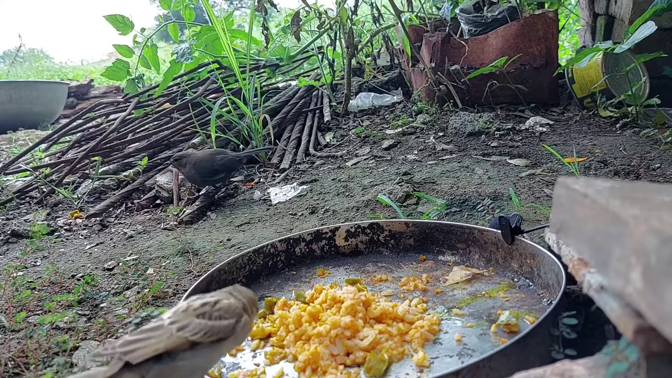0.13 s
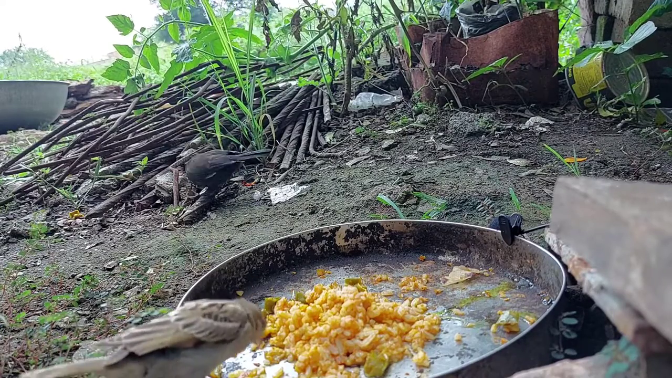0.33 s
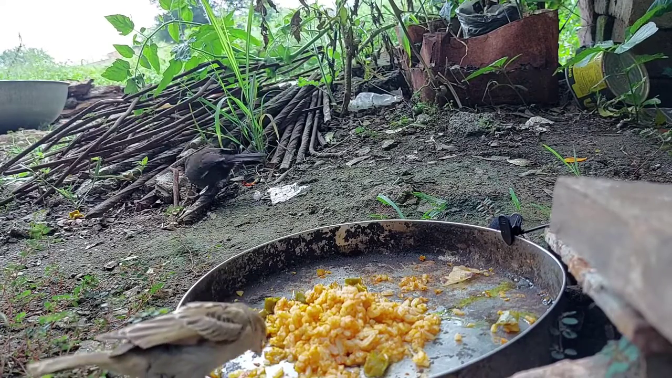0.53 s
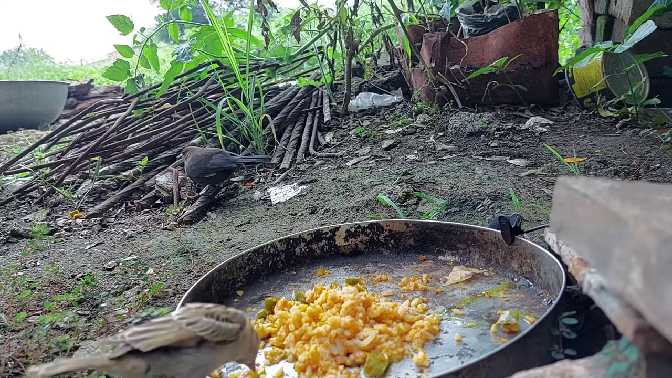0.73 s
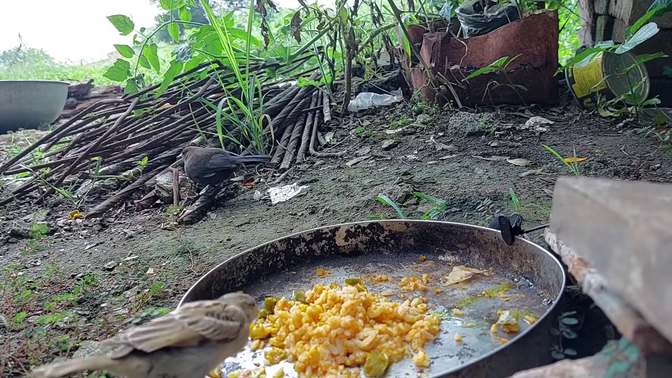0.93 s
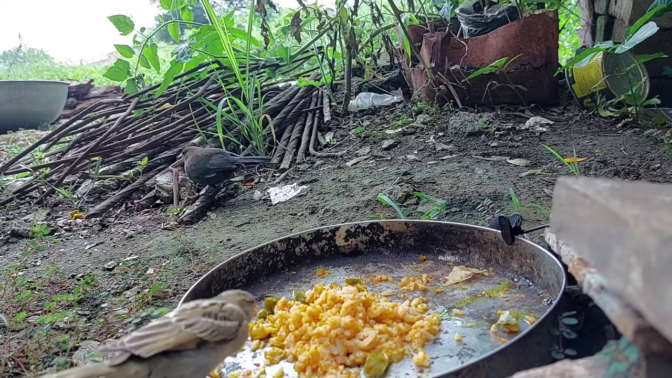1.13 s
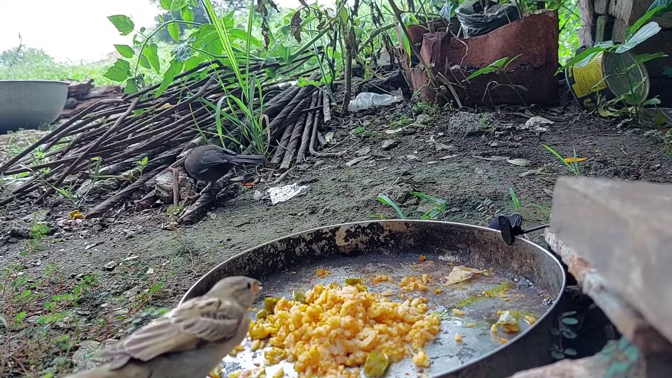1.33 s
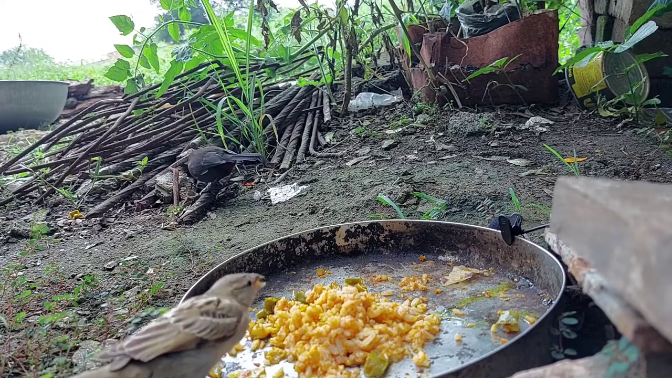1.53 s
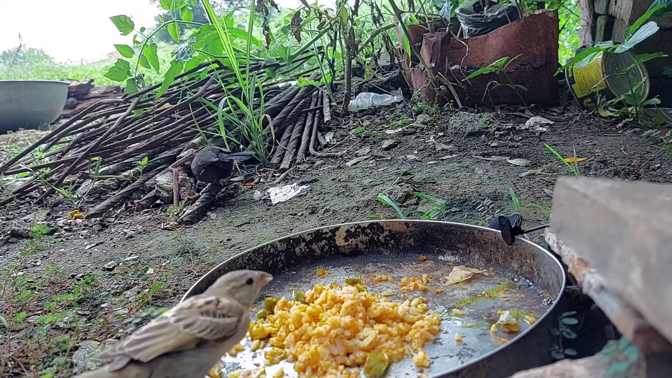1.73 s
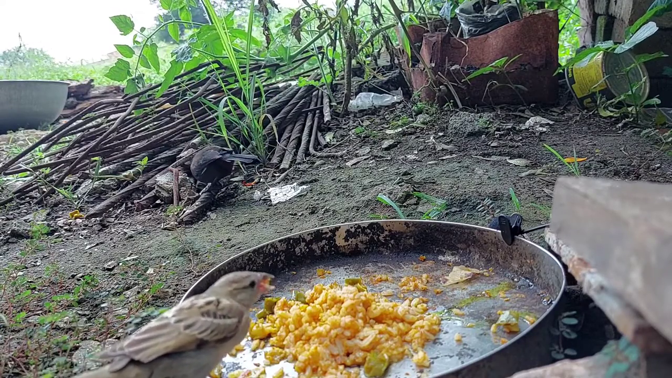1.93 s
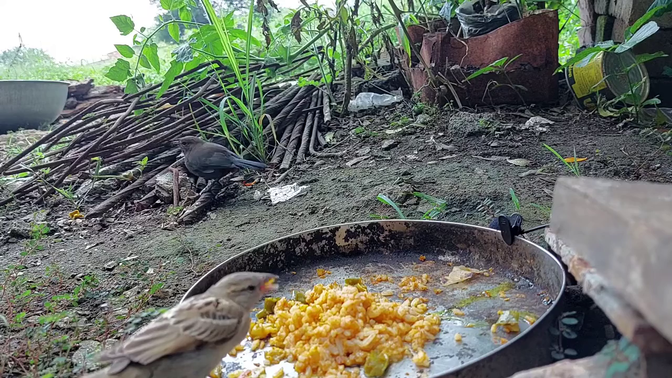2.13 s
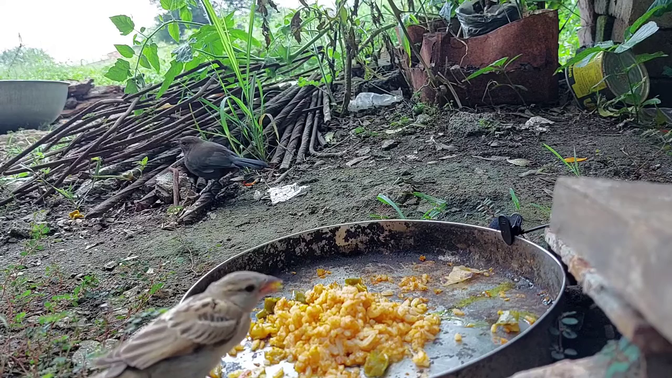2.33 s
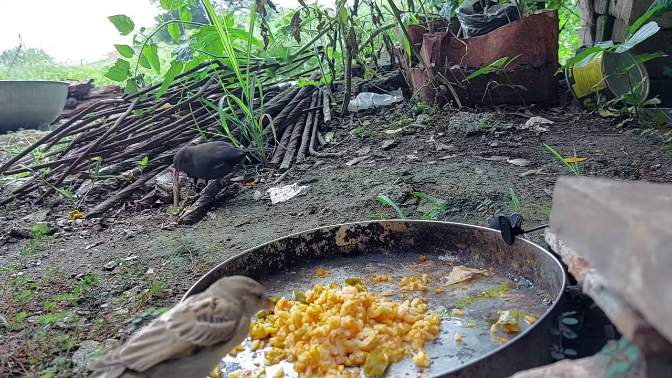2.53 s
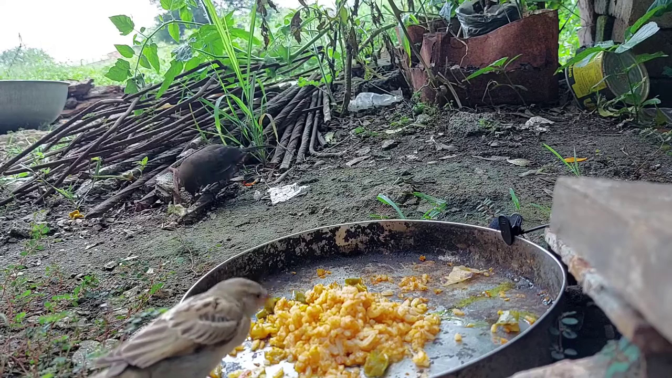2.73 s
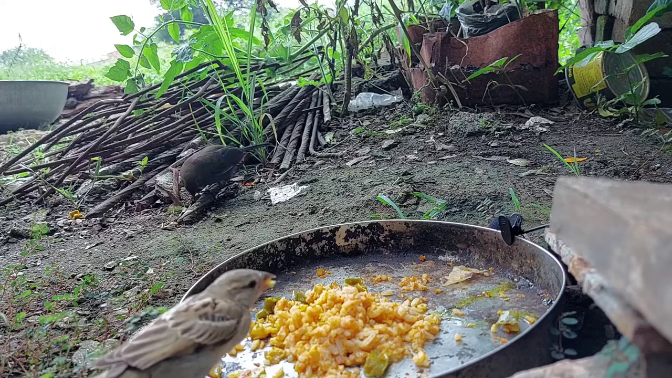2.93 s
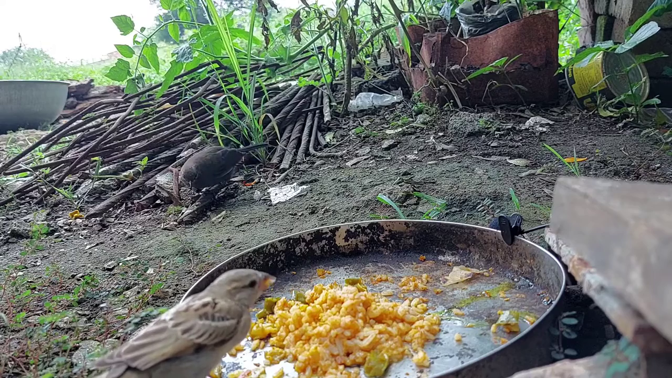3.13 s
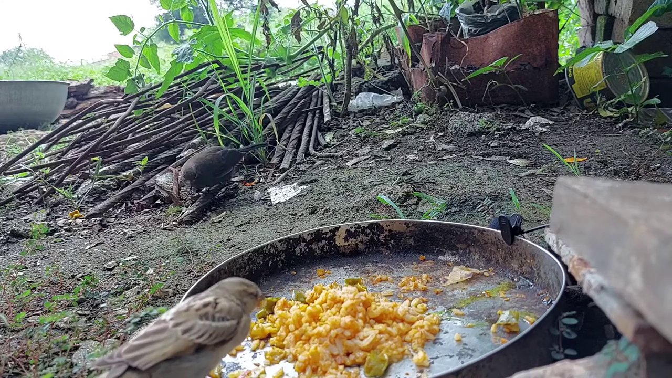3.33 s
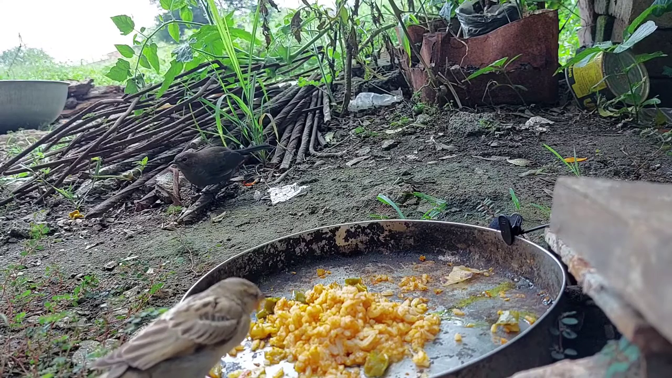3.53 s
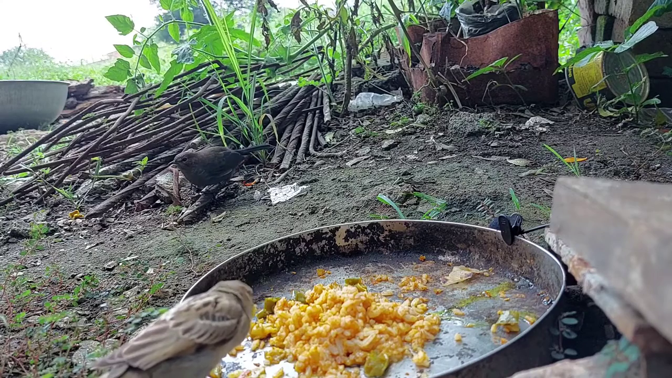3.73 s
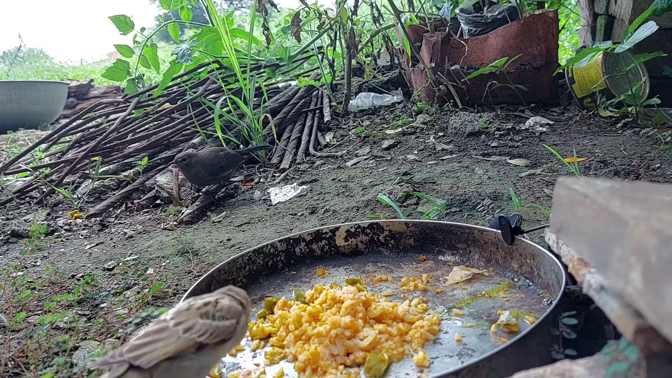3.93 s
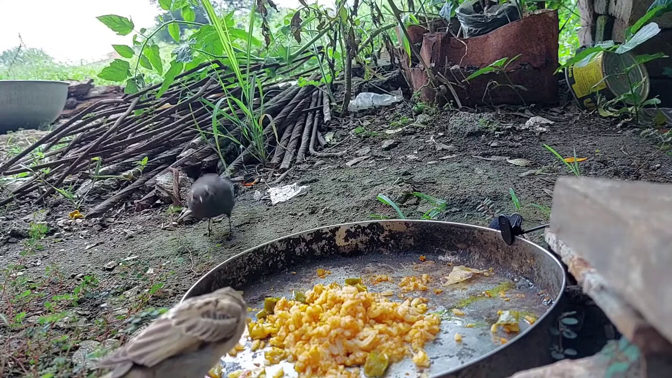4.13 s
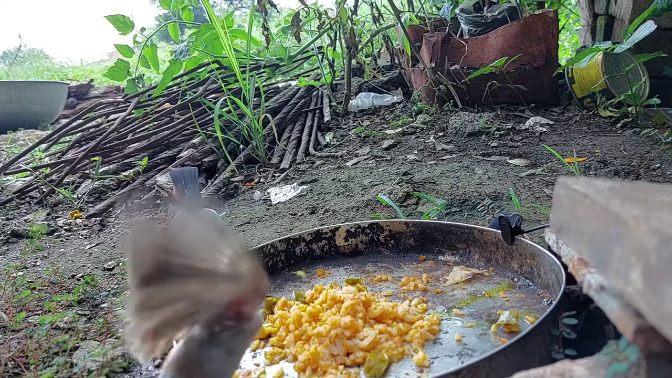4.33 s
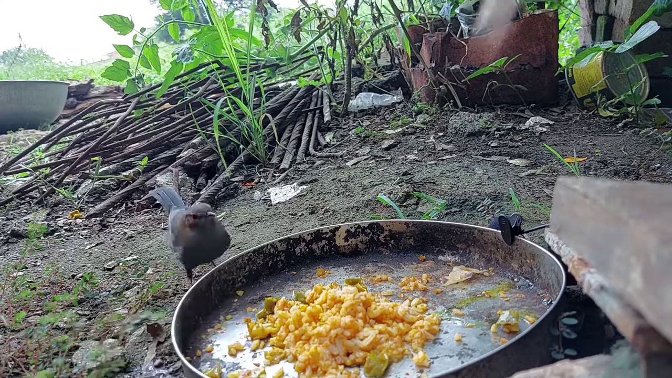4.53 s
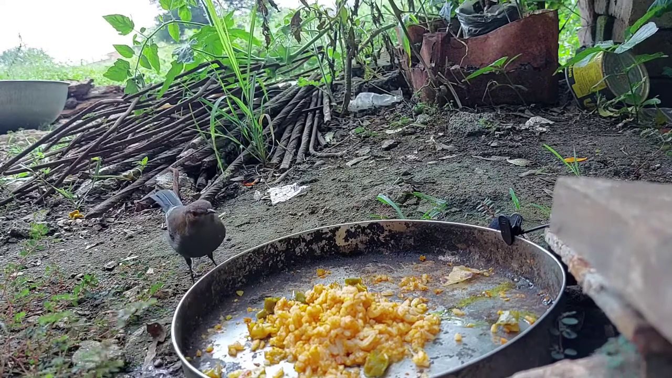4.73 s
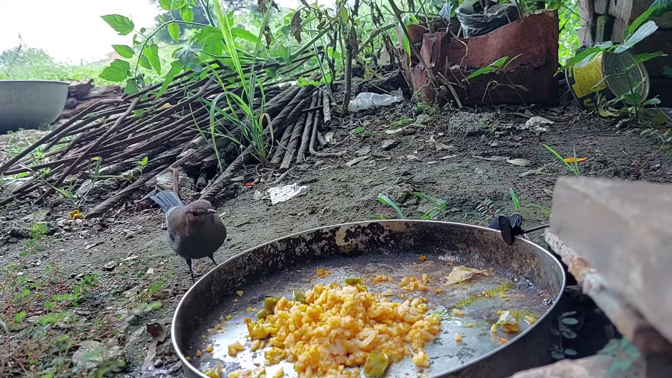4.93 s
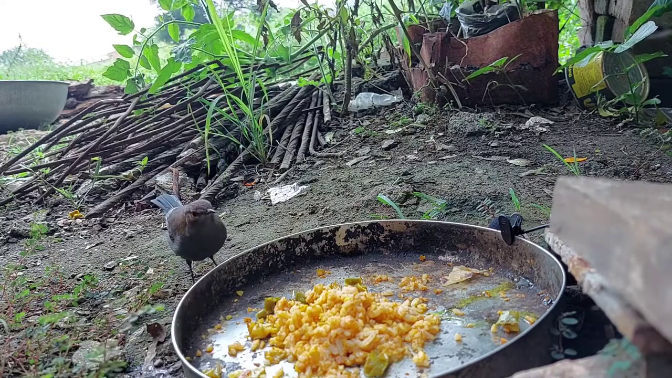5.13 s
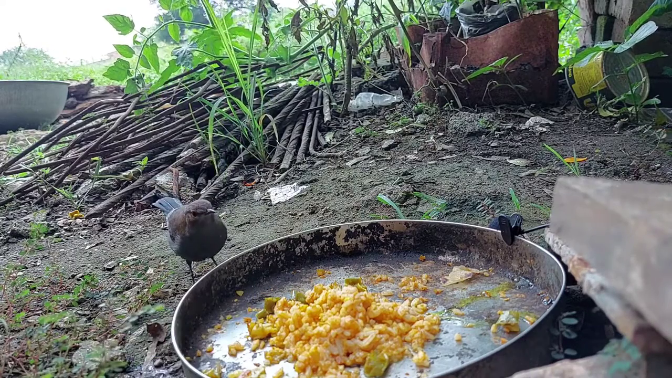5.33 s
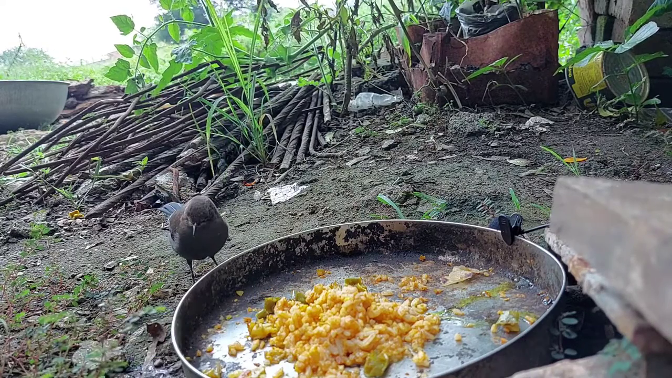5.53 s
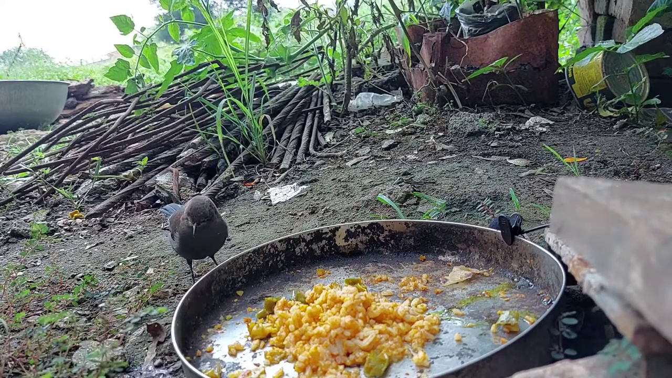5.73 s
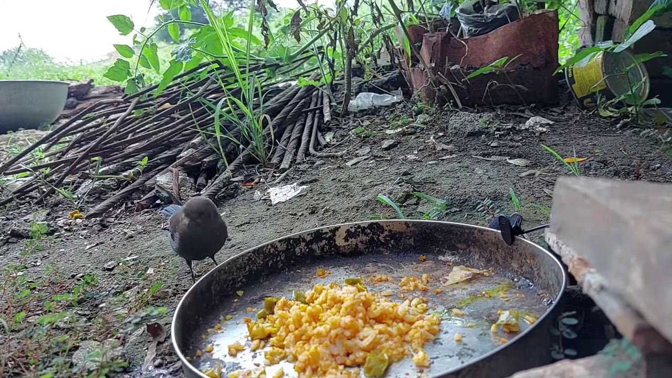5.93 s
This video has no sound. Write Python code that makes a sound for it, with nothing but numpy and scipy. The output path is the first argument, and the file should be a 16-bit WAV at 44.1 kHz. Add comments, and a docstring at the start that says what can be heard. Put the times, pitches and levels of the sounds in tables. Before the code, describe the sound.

Light beak ticks on a metal pan outdoors, then claws clack and a small bird flutters off right past the microphone.

```python
"""A quiet yard, close to a metal feeding pan. A sparrow pecks, shuffles its feathers and takes off.
Beak, claws and wing tips strike and scrape the pan, exciting its damped modes. Each wingbeat swishes
by friction between the feathers and pushes air at the microphone, fading as the bird flutters away.
Far off, small birds chirp and a faint hum comes and goes over a low rumble and a soft hiss."""
import sys
import numpy as np
from scipy import signal
from scipy.fft import rfft, irfft, next_fast_len
from scipy.io import wavfile
from scipy.ndimage import uniform_filter1d

SR = 44100
rng = np.random.default_rng(int(sys.argv[2]) if len(sys.argv) > 2 else 0)


def wav_out(sig):
    """Save sig, one row per channel (or a flat mono array), as 16-bit PCM at SR to the path in sys.argv[1]."""
    wavfile.write(sys.argv[1], SR, np.round(np.clip(np.atleast_2d(sig).T, -1, 1) * 32767).astype(np.int16))


N = 267510
T = np.arange(N) / SR
AGE = T[:SR // 2]  # time within one short event

# Spectrum of dry keratin scratching. Each row: frequency in Hz, gain in dB.
KERATIN_SPECTRUM = [(220, -24), (520, -7.5), (1500, -7.5), (2600, -10), (4200, -0.5), (5200, -4.5),
                    (7000, 5.5), (9000, 2.5), (10500, -7), (12500, -20.5), (15500, -39.5)]
# Spectrum of sliding feathers. Each row: frequency in Hz, gain in dB.
FEATHER_SPECTRUM = [(200, -23), (800, -14.5), (1700, -10.5), (3000, -9.5), (5000, -10), (7000, 2),
                    (9500, 2), (11000, -9), (13000, -19), (15500, -33.5)]
# Air pushed by the wings, strongest as the bird passes closest. Each row: time in seconds, level in dB.
WING_WASH = [(4.47, -37), (4.53, -21.5), (4.57, -27), (4.66, -38), (4.8, -47), (4.96, -44), (5.06, -39),
             (5.12, -49), (5.2, -50)]


def amp(db):
    """Decibels to amplitude ratio."""
    return 10 ** (np.asarray(db) / 20)


def curve(rows, column=1):
    """Linear interpolation of one table column over time."""
    rows = np.array(rows)
    return np.interp(T, rows[:, 0], rows[:, column])


def loudest(x, db, size=110):
    """Scale x so that its greatest short-time rms has this level."""
    return x * amp(db) / np.sqrt(uniform_filter1d(x * x, size).max())


def add(out, s, x):
    """Superpose x on out from time s."""
    start = max(int(s * SR), 0)
    out[start:start + len(x)] += x[:N - start]


def colour(x, points):
    """Minimum-phase filter through (Hz, dB) points, built by folding the cepstrum."""
    hz, db = np.transpose(points)
    n = 2 * next_fast_len(len(x))
    bin_hz = np.arange(n // 2 + 1) * SR / n
    gain = amp(np.interp(np.log(bin_hz + 1), np.log(hz), db))
    cepstrum = irfft(np.log(gain))
    cepstrum[1:n // 2] *= 2
    cepstrum[n // 2 + 1:] = 0
    return irfft(rfft(x, n) * np.exp(rfft(cepstrum)))[:len(x)]


def coloured_noise(spectrum):
    """Gaussian noise of unit rms with the given spectrum."""
    noise = colour(rng.standard_normal(N), spectrum)
    return noise / np.std(noise)


def cut(x, hz, kind, order=4):
    """Butterworth low-pass or high-pass."""
    return signal.sosfilt(signal.butter(order, hz, kind, fs=SR, output="sos"), x)


def walk(n, rate):
    """Slow random modulation of spread near 1, with rate new values a second."""
    return np.interp(T[:n] * rate, np.arange(n), rng.standard_normal(n))


def friction(rough_db, rate):
    """Stick-slip friction: noise whose level jumps as barbs or claws catch and slip."""
    return rng.standard_normal(len(AGE)) * amp(rough_db * walk(len(AGE), rate))


def swell(centre, width):
    """Gaussian envelope within an event."""
    return np.exp(-.5 * ((AGE - centre) / width) ** 2)


def plateau(t, hold, attack, release):
    """Exponential rise up to t = 0, a hold, then exponential decay."""
    return np.exp(np.minimum(t, 0) / attack - np.maximum(t - hold, 0) / release)


def scatter(x, t60, wet_db):
    """Diffuse reflection from ground, walls and leaves adds an exponentially decaying tail."""
    tail = rng.standard_normal(len(AGE)) * amp(-60 * AGE / t60) * (1 - np.exp(-AGE / .006))
    return x + amp(wet_db) * signal.fftconvolve(x, tail / np.linalg.norm(tail))[:N]


def yard():
    """Ambient noise: a low rumble under a soft hiss, highly correlated between the ears."""
    # Spectra of the common sound and the left-right difference. Each row: frequency in Hz, gain in dB.
    mid_spectrum = [(15, -26.5), (28, -11.5), (45, -4.5), (72, 2.5), (100, -3.5), (150, -12), (330, -20.5),
                    (700, -25), (1400, -27.5), (3000, -30.5), (4800, -35), (8300, -26), (10500, -35),
                    (12500, -45.5), (15500, -51)]
    side_spectrum = [(15, -42), (25, -6), (96, 11), (188, -11), (246, -7.5), (495, -12), (598, -16),
                     (970, -20), (1300, -30), (2420, -28.5), (3930, -26.5), (9550, -20.5), (15500, -23)]
    # Slow drift of the hiss. Each row: time in seconds, gain in dB.
    hiss_drift = [(.2, 5.5), (.5, 2.5), (1.1, 3.5), (2.4, 1.7), (3.7, 1.56), (5.3, -0.5), (6.07, -0.5)]
    mid = amp(-62.5) * coloured_noise(mid_spectrum)
    side = amp(-78) * coloured_noise(side_spectrum)
    # filtering forwards, then backwards offsets part of the phase lag
    lows = cut(cut(mid, 530, "low", order=2)[::-1], 240, "low", order=2)[::-1]
    rumble = lows * amp(-4 + 2.1 * walk(N, 3.5))
    hiss = (mid - lows) * amp(curve(hiss_drift) + .4 * walk(N, 6.3))
    return rumble + hiss + side * np.array([[1], [-1]])


def far_hum():
    """A faint low tone rises and fades; random frequency modulation makes it unsteady."""
    # Course of the tone. Each row: time in seconds, frequency in Hz, level in dB.
    course = [(1.1, 138, -75), (1.18, 156, -61), (1.26, 186, -65), (1.36, 189, -67.5), (1.44, 186, -62),
              (1.55, 181, -83)]
    hz = curve(course) * (1 + 0.03 * walk(N, 40))
    sounding = (T > course[0][0]) & (T < course[-1][0])
    return amp(curve(course, column=2)) * np.sin(2 * np.pi * np.cumsum(hz) / SR) * sounding


def bird_call(length, start_hz, end_hz, rough, bend):
    """A falling glide that levels out; fast frequency modulation spreads it into hoarse sidebands."""
    progress = np.clip(AGE / length, 0, 1)
    glide_hz = end_hz + (start_hz - end_hz) * (1 - progress) ** bend
    hz = glide_hz * (1 + 0.18 * rough * walk(len(AGE), 660))
    return np.sin(np.pi * progress ** 0.84) * np.sin(2 * np.pi * np.cumsum(hz) / SR)


def far_birds(whistle_pitch_ratio=1.32):
    """Frequency-modulated calls: hoarse chirps, all with the same fall, and two thin high whistles."""
    # Each row: start in seconds, length in seconds, level in dB.
    chirps = [(0.862, 0.084, -71), (1.23, 0.081, -74), (1.93, 0.13, -73.5), (2.119, 0.11, -72),
              (3.165, 0.14, -75), (3.885, .18, -75), (4.997, 0.13, -69), (5.11, 0.15, -76),
              (5.727, 0.095, -74), (5.92, .12, -74.5)]
    # Each row: start in seconds, length in seconds, end pitch in Hz, level in dB, roughness from 0 to 1.
    whistles = [(1.05, .07, 6500, -60, 0.4), (2.263, .1, 5450, -60, .08)]
    out = np.zeros(N)
    for s, length, db in chirps:
        add(out, s, amp(db) * bird_call(length, start_hz=4290, end_hz=3400, rough=0.52, bend=1.5))
    for s, length, end_hz, db, rough in whistles:
        add(out, s, amp(db) * bird_call(length, whistle_pitch_ratio * end_hz, end_hz, rough, bend=3.5))
    return out


def fidgets(shake_s=2.827, shake_hz=62, shake_depth_db=3.5, snip_decay_s=0.00094):
    """Friction of feathers in single flicks and one pulsing shake; brief impacts as the beak shuts."""
    # Feather flicks and snips at grains. Each row: time in seconds, level in dB.
    flicks = [(2.499, -58.5), (2.637, -53), (2.756, -53.5), (4.174, -51.5), (4.194, -53.5), (5.075, -58.5)]
    snips = [(0.078, -52), (0.7227, -54.5), (.7495, -53), (1.504, -55), (2.258, -49.5), (4.184, -57.5),
             (5.831, -55), (5.839, -52)]
    out, lead = np.zeros(N), 0.2
    for s, db in flicks:
        flick = friction(rough_db=3.5, rate=1000) * swell(lead, width=0.0036)
        add(out, s - lead, loudest(colour(flick, FEATHER_SPECTRUM), db))
    pulsing = amp(shake_depth_db * np.cos(2 * np.pi * shake_hz * (AGE - lead)))
    shake = friction(rough_db=4.5, rate=700) * swell(lead, width=0.034) * pulsing
    add(out, shake_s - lead, loudest(colour(shake, FEATHER_SPECTRUM), db=-44.5))
    for s, db in snips:
        snip = rng.standard_normal(len(AGE)) * np.exp(-AGE / snip_decay_s)
        add(out, s, loudest(colour(snip, KERATIN_SPECTRUM), db))
    return out


def draught(gust_s=4.445, gust_db=-34, wake_db=-17):
    """Turbulence at the microphone: a gust as the bird springs up, then a weaker wake from its wings."""
    # Spectrum of the eddies. Each row: frequency in Hz, gain in dB.
    eddy_spectrum = [(25, -12), (60, 10.5), (130, 2.5), (260, -8), (450, -12), (800, -18.5), (1600, -17),
                     (3500, -33.5), (10000, -42)]
    gust = amp(gust_db) * plateau(T - gust_s, hold=0.067, attack=.013, release=0.011)
    wake = amp(curve(WING_WASH) + wake_db) * (T > gust_s) * (T < WING_WASH[-1][0])
    return coloured_noise(eddy_spectrum) * np.hypot(gust, wake)


def wingbeats(fade_db_per_s=23.5):
    """Time and swish level of each beat: a nearly periodic train whose period drifts as it fades."""
    # Two bouts of flapping with a glide between. Each row: start, end, first period and
    # period growth per beat, all in seconds, then first swish level in dB.
    bouts = [(4.478, 4.78, .041, .0022, -51.5), (4.846, 5.13, .058, -.0027, -59)]
    beat = np.arange(8)
    for start, end, period, growth, db in bouts:
        for s in start + beat * period + beat * (beat - 1) / 2 * growth:
            if s < end:
                yield s, db - fade_db_per_s * (s - start)


def wings(stroke_width_s=.007, upstroke_lag_s=0.022, push_lag_s=0.006, push_hz=50):
    """Each stroke, down or up, makes friction noise and displaces air in a suck-then-push pulse."""
    out, lead = np.zeros(N), 0.05
    for s, db in wingbeats():
        strokes = swell(lead, stroke_width_s) + amp(-5.5) * swell(lead + upstroke_lag_s, stroke_width_s)
        swish = colour(friction(rough_db=1, rate=810) * strokes, FEATHER_SPECTRUM)
        add(out, s - lead, loudest(swish, db))
        wash_db = np.interp(s, *np.transpose(WING_WASH))
        for lag, stroke_db in ((0, 0), (upstroke_lag_s, -10)):
            centre = lead + push_lag_s + lag
            push = np.sin(2 * np.pi * push_hz * (AGE - centre)) * swell(centre, 0.46 / push_hz)
            add(out, s - lead, amp(wash_db + stroke_db) * push)
    return out


def touch_pan(skid, knock, ring_db, scratch_db, spot_hz, split_hz=3100):
    """Modal response: the weight of a touch rings the pan's low modes, its edge scratches the high."""
    # Modes of the pan, damped by the food in it.
    # Each row: frequency in Hz, relative level in dB, time to decay by 60 dB in seconds.
    pan_modes = [(459.3, -23.5, 0.062), (687, -30, .19), (776, -16.5, 0.011), (937, -20, 0.12),
                 (1196, -12, .03), (1230, -31.5, 0.32), (1248, -5.5, 0.028), (1416, -4, 0.014),
                 (1550, -1.5, 0.014), (1676, -20.5, 0.077), (1930, -6, 0.041), (1945, -29.5, .16),
                 (2252, -15.5, 0.094), (2606, -18.5, 0.1), (3035, -10, 0.036), (3407, -13, 0.058),
                 (4333, -4, .022), (4550, -7.5, .04), (5550, -21, 0.068), (5930, -17, 0.02),
                 (6810, -5.5, 0.038), (7670, -7.5, .05), (7800, -16.5, .05), (9220, -11, .05)]
    modes = sum((-1) ** k * amp(db - 60 * AGE / t60) * np.sin(2 * np.pi * hz * AGE)
                for k, (hz, db, t60) in enumerate(pan_modes))
    # the dry sound of the contact also radiates straight into the air
    direct = colour(1. * (AGE == 0), KERATIN_SPECTRUM) / 2
    ring = signal.fftconvolve(skid + knock, modes + amp(27) * direct)[:len(AGE)]
    scratch = signal.fftconvolve(skid, modes + amp(33) * direct)[:len(AGE)]
    # the touched spot favours one range of modes, the more so the blunter the blow
    focus_db = max(7 + .4 * (ring_db - scratch_db), 0)
    octaves = np.linspace(-2, 2, 41)
    boost_db = focus_db * np.exp(-.5 * (octaves / 0.21) ** 2)
    ring = colour(ring, np.column_stack([spot_hz * 2 ** octaves, boost_db]))
    lows = loudest(cut(ring, split_hz, "low"), ring_db)
    highs = loudest(cut(scratch, split_hz, "high"), scratch_db)
    return lows + highs


def pan_scrapes():
    """Stick-slip excitation: feet and wing tips drag over the metal at take-off and keep it ringing."""
    # Each row: start and length in seconds, ring and scratch levels in dB, favoured frequency in Hz.
    scrapes = [(4.387, 0.038, -35, -45, 1737), (4.444, 0.02, -31.5, -46.5, 1550),
               (4.468, 0.0073, -29.5, -38, 1447), (4.486, .012, -34, -30, 900)]
    out, lead = np.zeros(N), 0.02
    for s, length, ring_db, scratch_db, spot_hz in scrapes:
        envelope = plateau(AGE - lead, length, attack=.0015, release=.0025)
        drag = friction(rough_db=5, rate=900) * envelope
        add(out, s - lead, touch_pan(drag, 0, ring_db, scratch_db, spot_hz))
    return out


def pan_strikes(knock_over_skid_db=2):
    """Impact excitation: beak or claw gives the pan an impulse within a short skid."""
    # Each row: start in seconds, ring and scratch levels in dB, skid decay time in seconds,
    # favoured frequency in Hz.
    strikes = [(0.077, -57.5, -52, 0.0033, 800), (0.497, -61, -61, 0.0023, 1160),
               (0.5599, -51.5, -46.5, 0.0018, 1900), (1.384, -50, -56, 0.0043, 1550),
               (1.390, -39, -48.5, 0.0036, 1560), (2.1713, -59, -70, 0.0018, 1350),
               (2.333, -53, -67, 0.0013, 1460), (4.138, -60.5, -93, 0.0063, 646),
               (4.313, -62.5, -61.5, 0.0059, 1400), (4.356, -50.5, -46.5, 0.0074, 1300),
               (4.373, -41.5, -34, 0.0043, 1300), (4.385, -35.5, -38, 0.0041, 1900),
               (4.4229, -30.5, -25, 0.0024, 1900), (4.4388, -16.5, -27.5, .0026, 1578),
               (4.477, -28.5, -30, 0.0019, 1300), (4.502, -32.5, -48, .0018, 780),
               (5.072, -58.5, -67, 0.0063, 2400)]
    out = np.zeros(N)
    for s, ring_db, scratch_db, decay, spot_hz in strikes:
        rise = .35 * decay
        envelope = (1 - np.exp(-AGE / rise)) ** 2 * np.exp(-AGE / decay)
        skid = friction(rough_db=6.5, rate=1500) * envelope
        impulse = np.arange(len(AGE)) == int(rise * SR)
        knock = amp(knock_over_skid_db) * np.linalg.norm(skid) * impulse
        add(out, s, touch_pan(skid, knock, ring_db, scratch_db, spot_hz))
    return out


def scene():
    """Direct-to-reverberant ratio conveys distance: the sparrow is almost dry, the far birds blurred."""
    # Difference between the two microphone ports, greatest in the eddies and the highest treble.
    # Each row: frequency in Hz, relative gain in dB.
    port_difference = [(60, -13), (110, 10.5), (200, 12.5), (380, 12.5), (700, -3), (1300, -14), (4400, -4),
                       (8000, -2), (14000, 16)]
    sparrow = pan_strikes() + pan_scrapes() + wings() + draught() + fidgets()
    near = scatter(sparrow, t60=0.35, wet_db=-22.5)
    far = scatter(far_birds(), t60=0.3, wet_db=-5)
    side = amp(-34) * colour(near, port_difference) * np.array([[1], [-1]])
    return near + side + far + far_hum() + yard()


def record(dry, bottom_hz=36, top_hz=15700):
    """Band limiting: the microphone drops the deepest bass and the highest treble."""
    low_pass = signal.ellip(8, .2, 70, top_hz, fs=SR, output="sos")
    return signal.sosfilt(low_pass, cut(dry, bottom_hz, "high", order=1))


dry = scene()
out = record(dry)
wav_out(out)
```